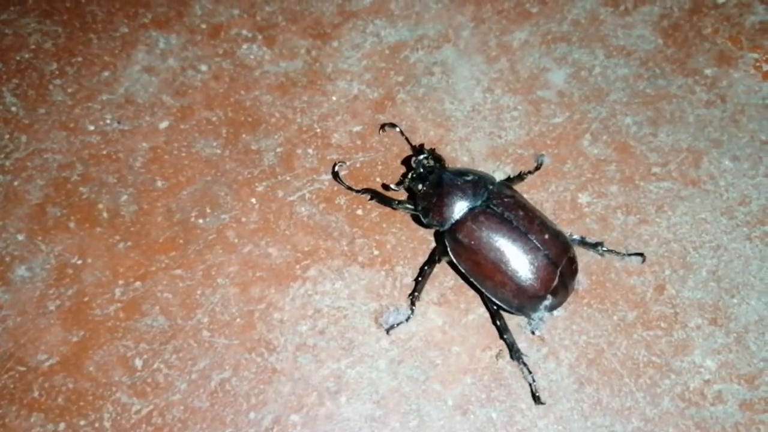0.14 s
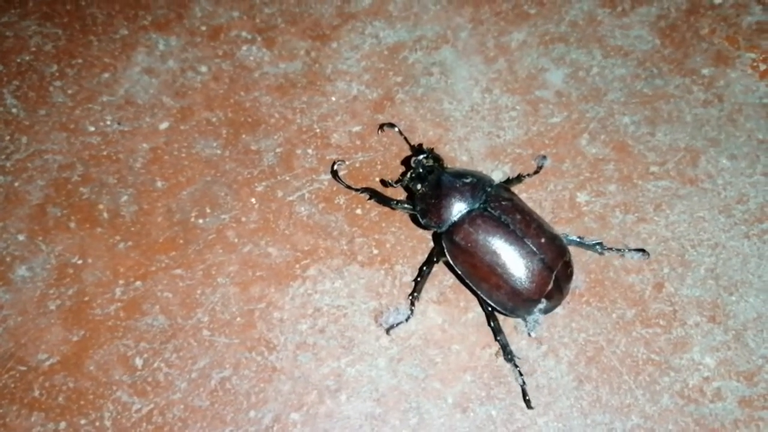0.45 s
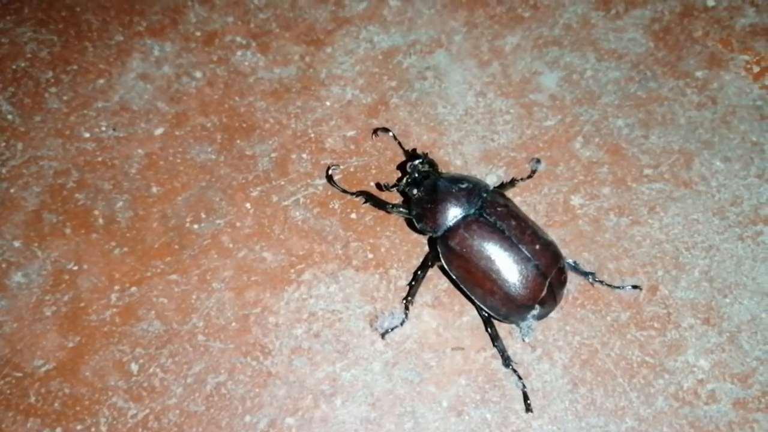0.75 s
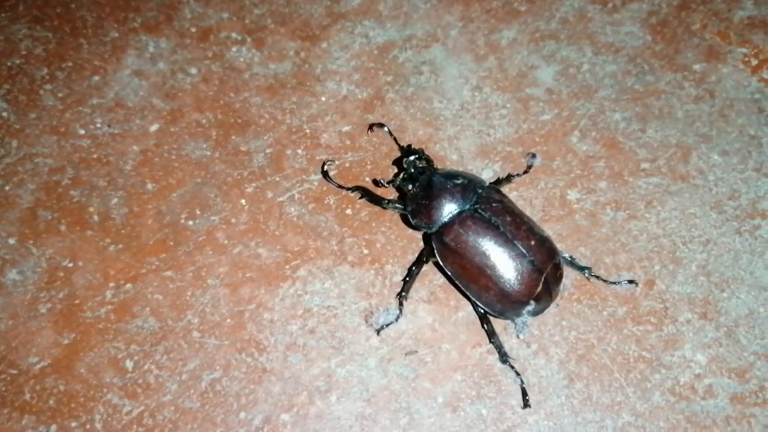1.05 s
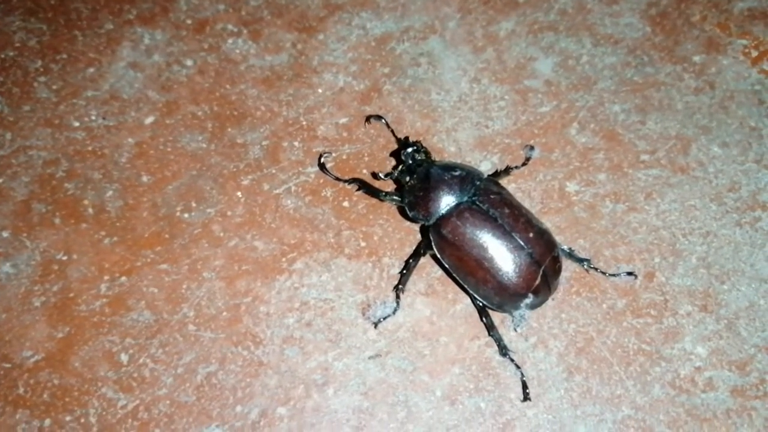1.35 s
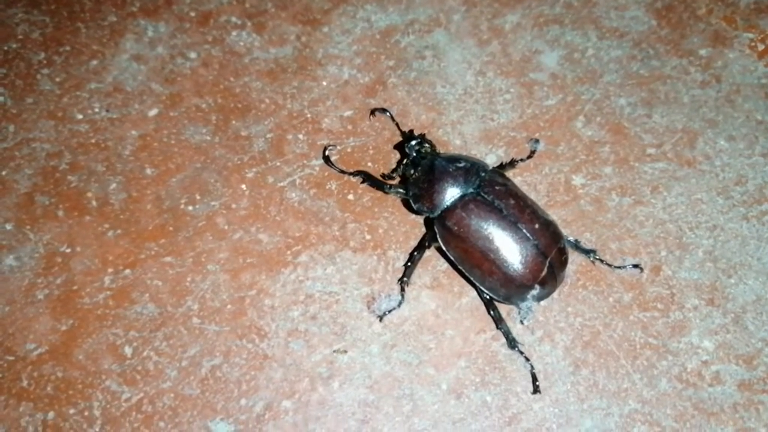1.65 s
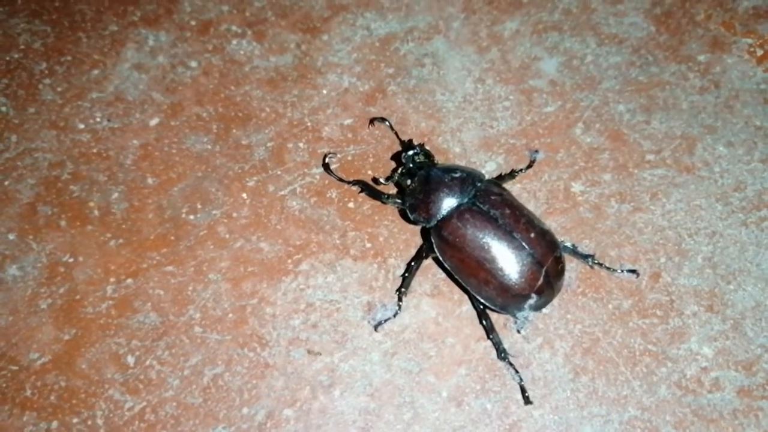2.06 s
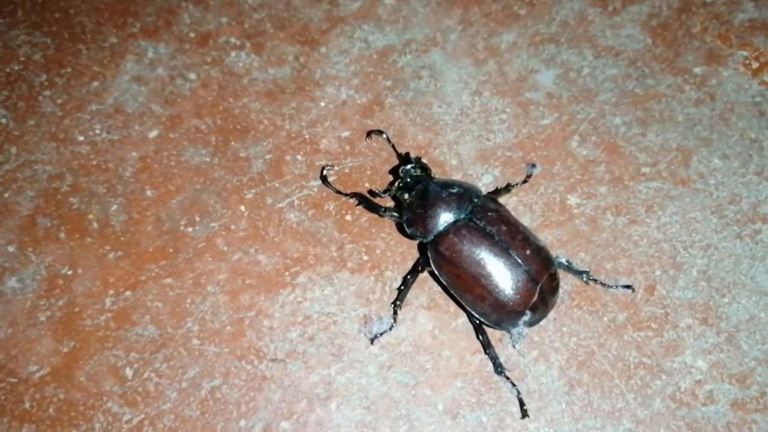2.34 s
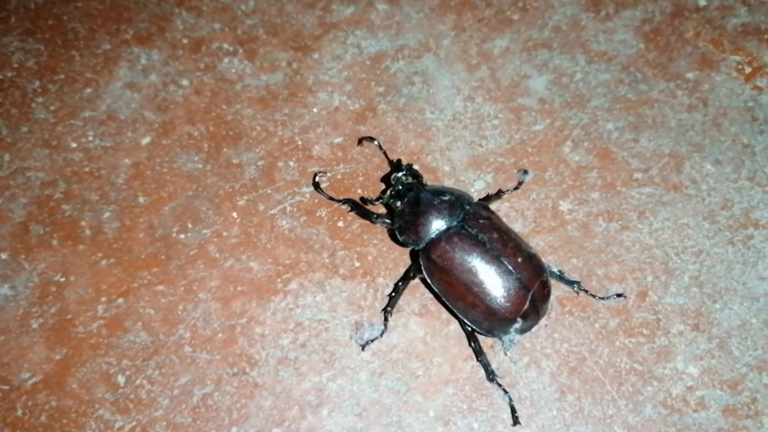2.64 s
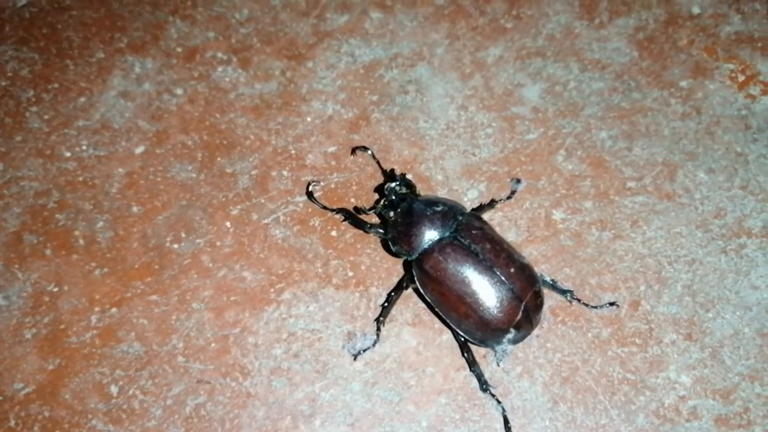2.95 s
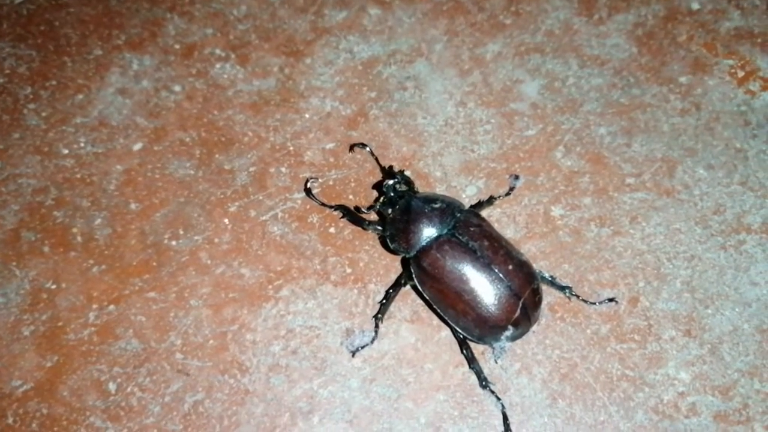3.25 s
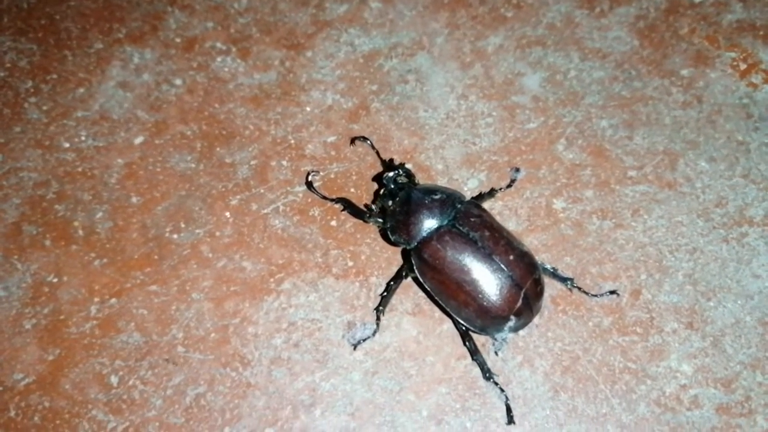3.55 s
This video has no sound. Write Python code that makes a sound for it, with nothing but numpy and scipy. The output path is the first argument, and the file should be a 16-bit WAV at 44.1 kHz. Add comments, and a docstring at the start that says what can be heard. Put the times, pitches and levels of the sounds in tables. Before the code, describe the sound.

Close up, a big beetle rubs its body against its wing cases, making a harsh, high two-part hiss, pausing briefly, then doing it again. Distant insects and a faint low rumble lie behind it.

```python
"""A large beetle on a tiled floor rasps twice, each rasp two strokes of its abdomen against the wing cases.
This is stridulation by stick-slip friction: a stroke starts as a fast hiss, slows into separate slips,
and now and then stalls or catches hard, while some slips jolt the body into dull thuds.
Two microphone ports hear it from close by; the right one resonates near 7 kHz.
Far insects shrill over a faint low rumble and hiss, and one soft tap falls between the rasps."""
import sys
import numpy as np
from scipy import signal
from scipy.fft import rfft, irfft, next_fast_len
from scipy.io import wavfile
from scipy.ndimage import map_coordinates

SR = 44100
rng = np.random.default_rng(int(sys.argv[2]) if len(sys.argv) > 2 else 0)


def wav_out(sig):
    """Save sig, one row per channel (or a flat mono array), as 16-bit PCM at SR to the path in sys.argv[1]."""
    wavfile.write(sys.argv[1], SR, np.round(np.clip(np.atleast_2d(sig).T, -1, 1) * 32767).astype(np.int16))


N = 163170

# spectra of the rumble, the hiss and the far insects (frequency [Hz], relative level [dB])
RUMBLE_SPECTRUM = [(15, 3), (35, -1.5), (70, 2), (120, -4), (200, -7), (320, -17), (520, -20), (900, -28),
                   (2000, -54)]
HISS_SPECTRUM = [(100, 2.5), (700, 3), (4000, .5), (9500, 4), (11000, -9), (15500, -7)]
INSECT_SPECTRUM = [(3800, -34), (4500, -26), (5200, -12), (5550, -32), (5900, -21), (6200, -6.5),
                   (6500, -3.5), (6750, 3), (7000, -15.5), (7500, -50), (8300, -38), (9300, -32),
                   (10500, -42.5)]
# envelope of the rumble (time [s], relative level [dB])
RUMBLE_ENVELOPE = [(0.0, -67.5), (0.44, -74), (1.61, -72.5), (1.89, -62.5), (2.09, -74), (3.7, -69)]
# spectrum of the rasp at each port (frequency [Hz], relative level [dB])
LEFT_SPECTRUM = [(300, -55), (900, -43), (1400, -35), (2100, -26), (3600, -24.5), (3950, -29), (4170, -42),
                 (4450, -26), (5100, -20), (5900, -25), (6900, -17.5), (8100, -16.5), (9500, -20.5),
                 (10300, -16.5), (11650, -24), (12300, -18), (13900, -21), (14800, -18), (15500, -32)]
RIGHT_SPECTRUM = [(300, -51.5), (900, -37), (1400, -36.5), (2000, -30.5), (2650, -21.5), (3300, -30),
                  (3900, -16), (4650, -5.5), (5150, -8.5), (5650, -18), (6400, -2), (6850, 5.5),
                  (7100, 2.5), (7480, -15), (8100, -7), (9400, -15.5), (9750, -42.5), (10300, -13.5),
                  (11400, -21.5), (12400, -22.5), (13500, -28), (14550, -11), (15400, -27.5)]
# phase lead of the left port, in antiphase near 3 kHz (frequency [Hz], lead [rad])
LEFT_PHASE_LEAD = [(100, .1), (1000, .6), (1400, 2), (1850, -.2), (2200, .1), (2550, 1.3), (2900, 3),
                   (3120, 3.25), (3450, .5), (4000, 1.3), (4300, 3.9), (5200, 5.2), (5900, 4.3),
                   (7200, 8.2), (7750, 7.4), (8500, 8.8), (11000, 10.2), (13000, 11.8), (13600, 14.8),
                   (15000, 18.5)]
# likeness of the clicks at the two ports (frequency [Hz], coherence [0..1])
PORT_COHERENCE = [(1500, .6), (2050, .92), (2500, .7), (2900, .99), (3100, .99), (3500, .7), (5000, .85),
                  (6000, .7), (7000, .87), (14000, .75)]
# response of the body to a jolt (frequency [Hz], relative level [dB])
BODY_SPECTRUM = [(200, -39), (450, -18), (750, -2), (1100, 5), (1400, -15), (2100, 7), (2600, -9.5),
                 (3000, -25), (5000, -9.5)]
# points of the spectrum over which a slip's power is normalised (frequency [Hz])
DRIVE_FREQUENCIES = [2400, 4400, 4900, 6450, 6700, 6900, 7100, 8100]
# slowing of every stroke (progress [0..1], slip rate [1/s])
STROKE_SLOWING = [(0, 740), (.11, 920), (.19, 405), (.45, 276), (.7, 235), (0.901, 214), (0.999, 135)]
# the abdomen sticks (time [s], duration [s])
STALL_SPANS = [(.733, .009), (1.128, .006), (1.137, .007), (2.895, .008), (2.907, .007), (2.95, .01),
               (2.967, .009), (3, .015), (3.293, .005)]
# single hard catches (time [s], relative level [dB])
HARD_CATCHES = [(0.4948, -25), (1.3292, -28), (1.4694, -29.5), (1.6181, -37.5), (1.6358, -38),
                (2.6248, -30.5), (2.6457, -31), (2.9631, -35), (3.0078, -30.5), (3.455, -36.5),
                (3.473, -38)]
# one envelope per stroke (time [s], relative level [dB], relative treble gain [dB])
STROKE_ENVELOPES = [
    [(0.225, -45, -21), (0.25, -38, -11.5), (0.31, -39.5, -14.5), (0.41, -44, -14), (0.62, -45, -15),
     (0.72, -49, -13.5), (0.86, -49.5, -13)],
    [(0.87, -47, -13), (0.895, -42, -14), (0.96, -43.5, -13), (0.985, -50, -16.5), (1.11, -48.5, -14.5),
     (1.16, -52, -10.5), (1.25, -52.5, -12), (1.4, -54, -9.5), (1.48, -53, -10.5), (1.61, -56, -13)],
    [(2.028, -43, -17.0), (2.045, -38.5, -17), (2.12, -40, -15), (2.24, -45, -14), (2.46, -46.5, -16),
     (2.56, -52, -11), (2.65, -53.5, -12.5)],
    [(2.665, -46, -15), (2.7, -42, -14), (2.755, -41.5, -17), (2.8, -49, -13.5), (2.95, -50, -11),
     (3.25, -51.5, -10.5), (3.33, -56.5, -6), (3.45, -53.5, -11.5)],
]
# strokes of the abdomen (start [s], end [s], low-band gain [dB], resonance shift [%],
# thud onset [s], thud level [dB], thud decay [dB/s])
ABDOMEN_STROKES = [(.225, .868, 0.5, -1.2, .324, -62, 34), (.867, 1.611, 2.5, 1.18, .975, -64.5, 26.5),
                   (2.025, 2.662, 2, 0.63, 2.16, -65.5, 24.5), (2.659, 3.449, 1, 2.1, 2.62, -68, 6.5)]

HISS_DB, RUMBLE_DB, RUMBLE_WIDTH = -72.5, -1.5, 0.57
INSECTS_LEFT_DB, INSECTS_RIGHT_DB, INSECTS_WAVER_DB = -69.5, -60, .5
TAP_S, TAP_HZ, TAP_T60_S, TAP_DB = 1.8605, 584, 0.0089, -51.5
ROOM_T60_S, ROOM_LEFT_DB, ROOM_RIGHT_DB = 0.083, -14, -17
RING_HZ, RING_GLIDE_PERCENT = 7040, 0.16  # shifts hold at this frequency and grow in proportion to it
THUD_PER_S, THUD_JITTER, SLIP_JITTER = 110, 0.32, .07  # jitter as a share of the period
SIZE_SCATTER_DB, TOOTH_SCATTER_DB = 1.54, 2.2
MIDDLE_PER_S, SLIP_S, SLIP_FADE_DB = 300, .0018, -4.5  # a slip's duration and decay at the middle rate
SLIP_LENGTH_EXPONENT = .35  # faster slips run on for longer
CATCH_DB, CATCH_PER_S, CATCH_CLEAR_S = -37.5, 200, .003  # no slip falls this near to a catch
RASP_DB, TREBLE_DB, TREBLE_FROM_HZ = 1.5, 12, 10250
LOW_BELOW_HZ, OPENING_DB, OPENING_S = 2100, -4, 0.26  # the low band starts weak, then settles
BAND_LIMIT_HZ = 15800


def amp(db):
    """Decibels to amplitude ratio."""
    return 10 ** (np.asarray(db) / 20)


def frequencies():
    """Frequencies of the zero-padded spectrum."""
    return np.fft.rfftfreq(2 * next_fast_len(N // 2 + 8192), 1 / SR)


def over_frequency(points):
    """Interpolation of (frequency, value) points on a logarithmic axis."""
    hz, values = np.transpose(points)
    return np.interp(np.log(frequencies() + 1), np.log(hz + 1), values)


def filtered(x, response):
    """Linear filtering: the spectrum is multiplied by a frequency response."""
    return irfft(rfft(x, 2 * (len(frequencies()) - 1)) * response)[..., :N]


def minimum_phase(spectrum):
    """Causality: folding the cepstrum onto positive time gives a response that rings after the impulse."""
    cepstrum = irfft(np.log(amp(over_frequency(spectrum))))
    half = len(cepstrum) // 2
    cepstrum[1:half] *= 2
    cepstrum[half + 1:] = 0
    return np.exp(rfft(cepstrum))


def over_time(rows, column=1):
    """Linear interpolation of one column of a time table."""
    rows = np.asarray(rows)
    return np.interp(np.arange(N) / SR, rows[:, 0], rows[:, column])


def wobble(per_s):
    """Smooth random modulation: a spline through Gaussian knots."""
    knots = rng.standard_normal(int(N * per_s / SR) + 4)
    return map_coordinates(knots, [np.arange(N) * per_s / SR])


def noise(spectrum):
    """Spectral shaping: two independent coloured noises of rms 1."""
    coloured = filtered(rng.standard_normal((2, N)), amp(over_frequency(spectrum)))
    return coloured / np.sqrt(np.mean(coloured ** 2) + 1e-20)


def impulses(times, sizes):
    """Superposition of impulses at the given times."""
    samples = np.clip(np.ravel(times) * SR, 0, N - 1).astype(int)
    return np.bincount(samples, np.ravel(sizes), N)


def background():
    """Partial coherence: the low rumble is mostly common to both ports, the thin hiss is independent."""
    mid, side = noise(RUMBLE_SPECTRUM)
    rumble = np.array([mid + RUMBLE_WIDTH * side, mid - RUMBLE_WIDTH * side])
    return rumble * amp(over_time(RUMBLE_ENVELOPE) + RUMBLE_DB) + amp(HISS_DB) * noise(HISS_SPECTRUM)


def insects():
    """Incoherent summation: a far chorus merges into a narrow, wavering band of noise."""
    chorus = noise(INSECT_SPECTRUM) * amp(INSECTS_WAVER_DB * wobble(per_s=41.0))
    return chorus * amp([[INSECTS_LEFT_DB], [INSECTS_RIGHT_DB]])


def tap():
    """Damped oscillation: one quickly decaying mode makes a soft, dull tap."""
    age = np.maximum(np.arange(N) / SR - TAP_S, 0)
    return amp(TAP_DB - 60 * age / TAP_T60_S) * np.sin(2 * np.pi * TAP_HZ * age)


def room(direct):
    """Reverberation: scatter from the floor and nearby walls forms a short exponential tail."""
    t = np.arange(SR // 4) / SR
    tail = rng.standard_normal((2, len(t))) * amp(-60 * t / ROOM_T60_S)
    tail /= np.linalg.norm(tail, axis=1, keepdims=True)
    return signal.fftconvolve(direct, tail, axes=1)[:, :N] * amp([[ROOM_LEFT_DB], [ROOM_RIGHT_DB]])


def ports(shift_percent):
    """Resonance colours the rasp at each port; the right one's ring shifts with the beetle's posture."""
    hz, db = np.transpose(RIGHT_SPECTRUM)
    shifted_hz = hz * (1 + shift_percent / 100 * hz / RING_HZ)
    right = minimum_phase(np.column_stack([shifted_hz, db]))
    left_phase = np.angle(right) + over_frequency(LEFT_PHASE_LEAD)
    left = amp(over_frequency(LEFT_SPECTRUM)) * np.exp(1j * left_phase)
    return np.array([left, right]) / np.sqrt(np.mean(np.abs((left + right) / 2) ** 2))


def thuds(slip_times, onset, thud_db, fade_db_per_s):
    """Impulse excitation: as the slips come apart, every few slips one jolts the whole body."""
    due = np.arange(onset, slip_times[-1], 1 / THUD_PER_S)
    due += THUD_JITTER * rng.standard_normal(len(due)) / THUD_PER_S
    nearest = np.abs(slip_times - due[:, None]).argmin(axis=1)
    times = np.unique(slip_times[nearest])
    sizes = amp(thud_db - fade_db_per_s * (times - onset) + SIZE_SCATTER_DB * rng.standard_normal(len(times)))
    jolts = impulses(times, sizes * np.sqrt(SR / THUD_PER_S))
    body = minimum_phase(BODY_SPECTRUM)
    return filtered(jolts, body / np.sqrt(np.mean(np.abs(body) ** 2)))


def slips(start, end, catch_times):
    """Stick-slip friction: times and rates of one slip per cycle, except in a stall or near a catch."""
    t = np.arange(start, end, 1 / SR)
    rate = np.interp((t - start) / (end - start), *np.transpose(STROKE_SLOWING))
    cycle = np.floor(np.cumsum(rate) / SR)
    at = np.flatnonzero(np.diff(cycle, prepend=-1))
    times = t[at] + SLIP_JITTER * rng.standard_normal(len(at)) / rate[at]
    moving = [(times < stall) | (times > stall + length) for stall, length in STALL_SPANS]
    clear = [np.abs(times - catch) > CATCH_CLEAR_S for catch in catch_times]
    free = np.all(moving + clear, axis=0)
    return times[free], rate[at][free]


def teeth(times, sizes, rate, count=7):
    """File and scraper: each slip crosses a few teeth, an even scrape when fast, a crisp tick when slow."""
    shape = (len(times), count)
    speed = rate[:, None] / MIDDLE_PER_S
    place = (np.arange(count) + rng.random(shape)) / count
    duration = SLIP_S * speed ** SLIP_LENGTH_EXPONENT * rng.uniform(.6, 1.3, (len(times), 1))
    at = np.round((times[:, None] + duration * place) * SR)
    polarity = rng.choice([-1, 1], shape)
    fade_db = SLIP_FADE_DB * place / speed ** 2
    force = polarity * amp(TOOTH_SCATTER_DB * rng.standard_normal(shape) + fade_db)
    # normalise each slip so that interference between its teeth does not set its strength
    drive = [np.sum(force * np.exp(2j * np.pi * hz * at / SR), axis=1) for hz in DRIVE_FREQUENCIES]
    gain = sizes / np.sqrt(np.mean(np.abs(drive) ** 2, axis=0))
    return impulses((at + .5) / SR, force * gain[:, None])


def stroke(times, rate, low_db, shift_percent, envelope, catches):
    """Source and filter: the tooth clicks of one stroke's slips and catches excite the two ports."""
    age = np.maximum(np.arange(N) / SR - times[0], 0)
    progress = np.minimum(age / (times[-1] - times[0]), 1)
    knot_s, knot_db, _ = np.transpose(envelope)
    scatter_db = SIZE_SCATTER_DB * rng.standard_normal(len(times))
    sizes = np.sqrt(SR / rate) * amp(np.interp(times, knot_s, knot_db) + RASP_DB + scatter_db)
    # hard catches join as extra slips
    times = np.append(times, catches[:, 0])
    sizes = np.append(sizes, amp(catches[:, 1] + CATCH_DB) * np.sqrt(SR))
    rate = np.append(rate, np.full(len(catches), CATCH_PER_S))
    rasp = np.array([teeth(times, sizes, rate), teeth(times, sizes, rate)])
    low = filtered(rasp, 1 / (1 + (frequencies() / LOW_BELOW_HZ) ** 10))
    treble = filtered(rasp, 1 - 1 / (1 + (frequencies() / TREBLE_FROM_HZ) ** 20))
    low_gain = amp(low_db + OPENING_DB * np.exp(-age / OPENING_S))
    treble_gain = amp(over_time(envelope, column=2) + TREBLE_DB)
    shared, stray = rasp + low * (low_gain - 1) + treble * (treble_gain - 1)
    coherence = np.clip(over_frequency(PORT_COHERENCE), 0, 1)
    left = filtered(shared, coherence) + filtered(stray, np.sqrt(1 - coherence ** 2))
    pair = np.array([left, shared])
    # a crossfade glides the resonance upward along the stroke
    early = filtered(pair * (1 - progress), ports(shift_percent - RING_GLIDE_PERCENT))
    late = filtered(pair * progress, ports(shift_percent + RING_GLIDE_PERCENT))
    return early + late


def beetle():
    """Stridulation: four strokes of abdomen on wing cases, each with hard catches and body thuds."""
    catches, sound = np.array(HARD_CATCHES), np.zeros((2, N))
    owner = np.searchsorted([row[0] for row in ABDOMEN_STROKES], catches[:, 0]) - 1
    for k, (start, end, low_db, shift, thud_onset, thud_db, thud_fade) in enumerate(ABDOMEN_STROKES):
        own_catches = catches[owner == k]
        times, rate = slips(start, end, own_catches[:, 0])
        sound += stroke(times, rate, low_db, shift, STROKE_ENVELOPES[k], own_catches)
        sound += thuds(times, thud_onset, thud_db, thud_fade)
    return sound


def scene():
    """Superposition of the near beetle, its reverberation and the far sounds."""
    rasp = beetle()
    return rasp + room(rasp) + insects() + background() + tap()


def record(dry):
    """Band limiting: an ideal low-pass filter removes the highest treble."""
    return filtered(dry, frequencies() < BAND_LIMIT_HZ)


dry = scene()
out = record(dry)
wav_out(out)
```